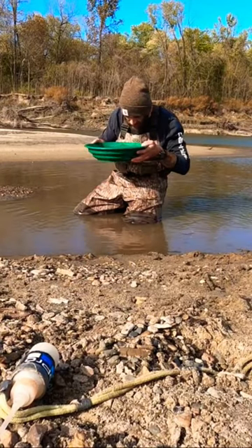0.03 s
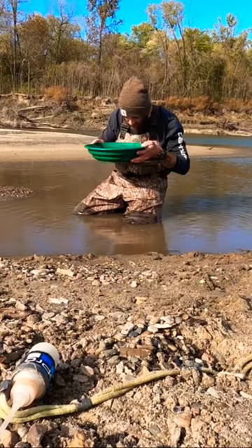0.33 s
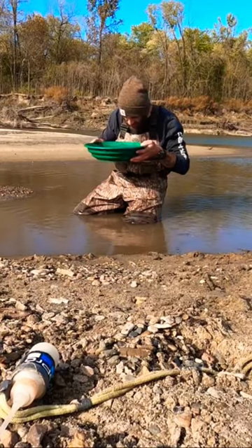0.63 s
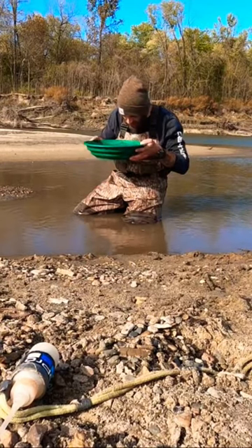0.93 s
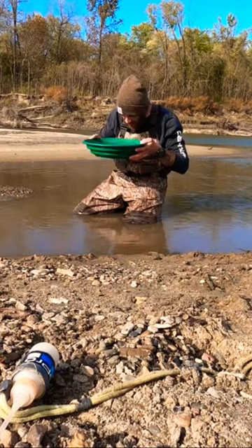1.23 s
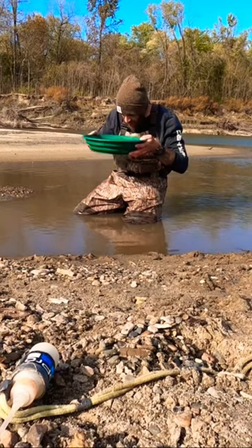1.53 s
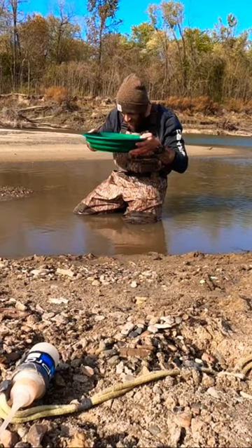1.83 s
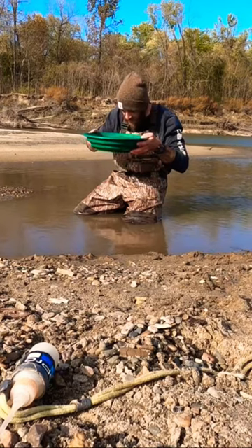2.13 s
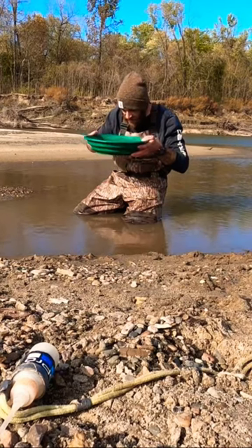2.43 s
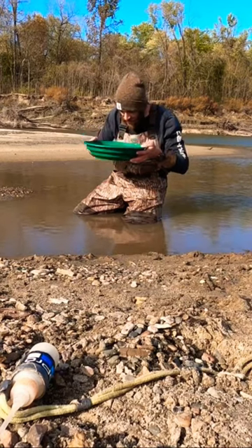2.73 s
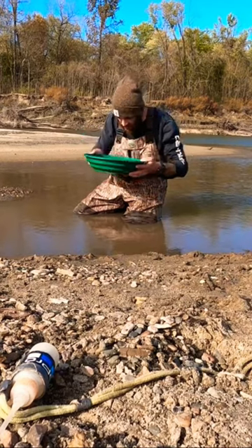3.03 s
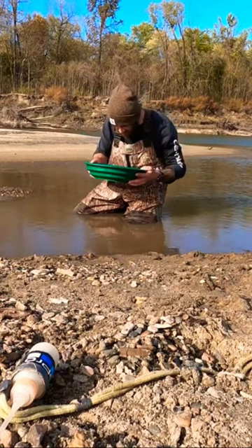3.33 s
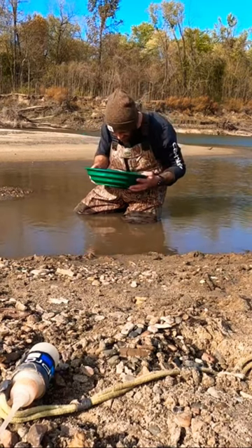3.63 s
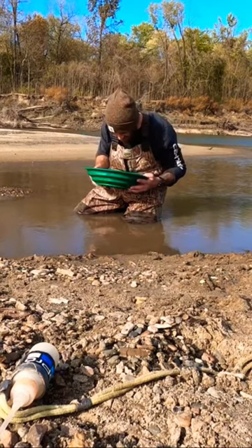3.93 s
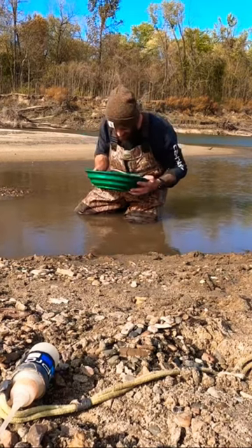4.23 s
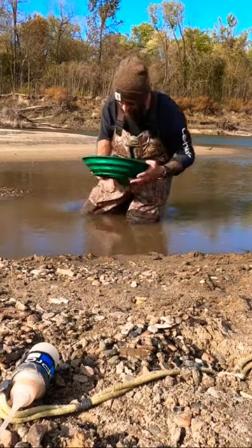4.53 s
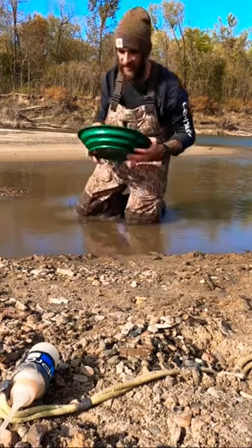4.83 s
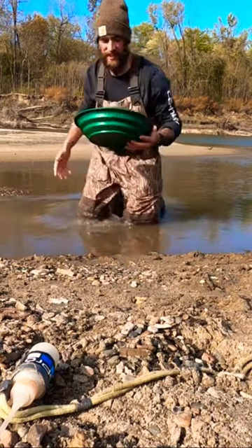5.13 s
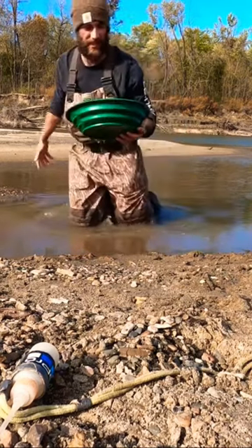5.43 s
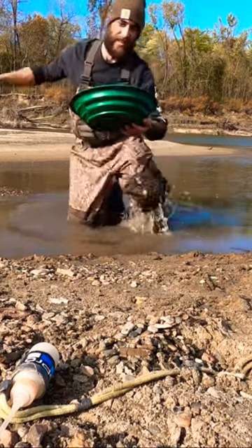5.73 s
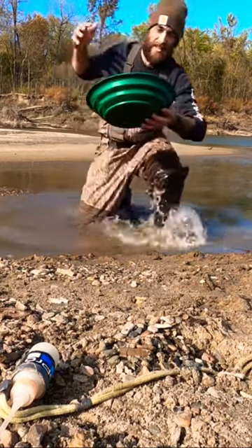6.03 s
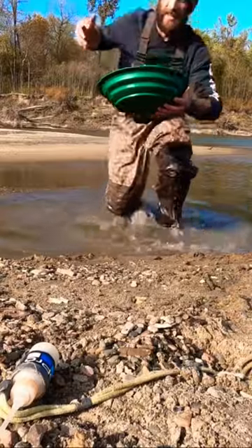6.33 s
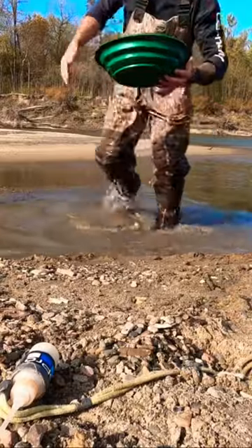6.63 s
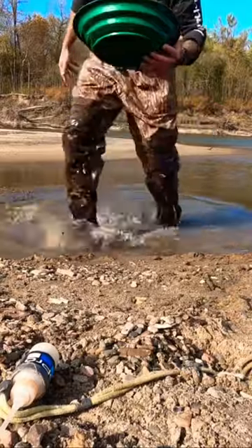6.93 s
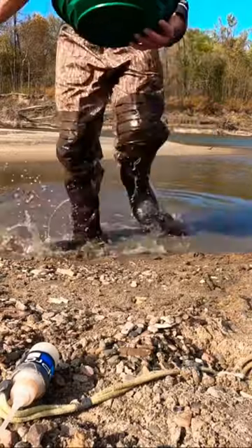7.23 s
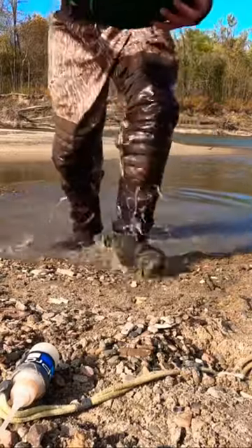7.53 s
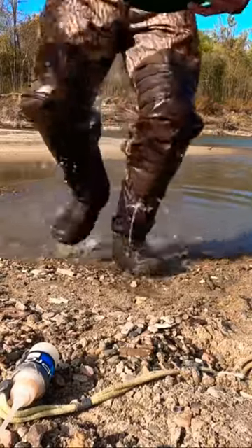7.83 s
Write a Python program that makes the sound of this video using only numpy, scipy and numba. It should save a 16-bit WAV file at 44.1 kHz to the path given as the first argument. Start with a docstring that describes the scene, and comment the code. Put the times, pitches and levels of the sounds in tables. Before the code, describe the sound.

Low wind rumbles and gusts on the microphone throughout, over a soft outdoor hiss and the drone and whine of a distant engine that fades in and out. For the first five seconds little else is heard, apart from four light, hollow knocks on a plastic pan at about 2.6, 3.2, 4.1 and 4.8 seconds. Around 5 seconds water begins to drip and plop as a man stands up in the shallow river. At about 5.8 seconds a boot pulls free with a sharp slap and a gulp. From 6 seconds he wades towards the microphone, his legs churning up bubbling, gurgling water while spray and drops patter back. Stronger splashes land near 6.5, 7.3 and 7.6 seconds. The wading is the loudest sound and continues, with stronger wind gusts, until the end at about 8 seconds.

```python
"""Wind rumbles on a microphone set low on a gravel bank, over open-air hiss and a far engine's drone.
Out in the shallow river a kneeling man swirls water in a plastic pan, knocking it lightly now and then.
He stands, water running off his waders, and wades towards the microphone: his legs churn up clouds of
ringing bubbles, air pockets plop and gurgle, his boots slap and gulp, and thrown water patters back."""
import sys
import numpy as np
from scipy import signal
from scipy.fft import rfft, irfft, next_fast_len
from scipy.io import wavfile
from numba import njit

SR = 44100
rng = np.random.default_rng(int(sys.argv[2]) if len(sys.argv) > 2 else 0)


def log_audio(samples):
    """Write samples as a 16-bit WAV file to the path given in sys.argv[1]."""
    # one column per channel
    frames = np.atleast_2d(samples).T
    # limit to full scale, then quantise
    limited = np.clip(frames, -1, 1)
    pcm = np.round(limited * 32767).astype(np.int16)
    wavfile.write(sys.argv[1], SR, pcm)


N = 351918
TIME = np.arange(N) / SR
IMPACT_SWELL, BUBBLE_SWELL, POCKET_SWELL = .6, .9, 1.47  # cycles taken to sound fully


def undb(db):
    """Decibels to gain."""
    return 10 ** (np.asarray(db) / 20)


def unit(x):
    """Scale to rms 1."""
    return x / np.sqrt(np.mean(x ** 2) + 1e-18)


def colour(x, points):
    """Causal filter through (Hz, dB) points, built from the cepstrum of the log gain."""
    hz, db = np.transpose(points)
    size = next_fast_len(2 * N, real=True)
    bins_hz = np.maximum(np.fft.rfftfreq(size, 1 / SR), 1)
    gain = undb(np.interp(np.log(bins_hz), np.log(hz), db))
    cepstrum = irfft(np.log(gain), size)
    cepstrum[1:size // 2] *= 2
    cepstrum[size // 2 + 1:] = 0
    return irfft(rfft(x, size) * np.exp(rfft(cepstrum)), size)[:N]


def wander(per_s):
    """Random drift with a spread near 1."""
    knots = rng.standard_normal(4096)
    return 1.2 * np.interp(TIME * per_s, np.arange(len(knots)), knots)


def envelope(s, hold, attack, release):
    """Gain that rises to 1 at s, holds and falls, by 20 dB in each attack or release time."""
    before, after = np.maximum(s - TIME, 0), np.maximum(TIME - s - hold, 0)
    return undb(-20 * (before / attack + after / release)) + 1e-9


@njit
def ring(start, size, hz, t60, rise, swell):
    """Bubbles or modes: sines that swell, then die away while their pitch climbs by the share `rise`."""
    out = np.zeros(N)
    for k in range(len(start)):
        first, count = int(start[k] * SR), max(int(t60[k] * SR), 2)
        fade = np.exp(-np.log(1000) / count)
        gain, phase = size[k], 0.
        for i in range(min(count, N - first)):
            phase += 2 * np.pi * min(hz[k] * (1 + rise[k] * i / count) / SR, .45)
            gain *= fade
            onset = min(phase / (2 * np.pi * swell), 1.)
            out[max(first + i, 0)] += gain * onset * onset * (3 - 2 * onset) * np.sin(phase)
    return out


# Wind right on the microphone: (frequency [Hz], gain [dB])
WIND_COLOUR = [(10, -17), (22, 2), (55, 1.5), (110, -2.5), (200, -8.5), (300, -18), (500, -26), (800, -34),
               (1500, -101), (6000, -100)]
# Gusts at the microphone: (peak time [s], level [dB], length [s])
GUSTS = [(0.402, -26.5, 0.083), (0.57, -23.5, 0.085), (1.105, -25.5, 0.058), (1.256, -31.5, 0.36),
         (1.565, -26, 0.067), (1.78, -26.5, 0.2), (1.975, -23.5, 0.083), (3.348, -28, 0.12),
         (3.683, -28, 0.096), (4.19, -34.5, 0.57), (5.758, -18, 0.052), (6.107, -25, 0.57),
         (6.485, -28, 0.24), (6.84, -19, 0.2), (7.06, -28.5, 0.29), (7.542, -22, 0.1), (7.784, -18, 0.087),
         (7.9, -20, 0.092)]

def wind(breeze_db=-33, buffet_db=1.13):
    """Eddies buffet the microphone: a steady breeze, and bell-shaped gusts that are a little brighter."""
    gust_power = sum(undb(db) ** 2 * np.exp(-(2 * (TIME - s) / length) ** 2) for s, db, length in GUSTS)
    breeze, eddies = (colour(rng.standard_normal(N), WIND_COLOUR) for _ in range(2))
    eddies = colour(eddies, [(50, 0.0019), (150, 2.2)])
    rumble = undb(breeze_db) * unit(breeze) + np.sqrt(gust_power) * unit(eddies)
    return rumble * undb(buffet_db * wander(25))


# Open air all round the river: (frequency [Hz], gain [dB])
AIR_COLOUR = [(30, 6), (150, 5.5), (320, 4), (500, 0.5), (700, -7), (1000, -16.5), (2200, -21.5),
              (4200, -30.5), (6000, -38.5), (8000, -49.5), (9500, -63.5), (15000, -80)]

def open_air(level_db=-40.5):
    """A soft, nearly steady outdoor hiss."""
    hiss = unit(colour(rng.standard_normal(N), AIR_COLOUR))
    return hiss * undb(level_db + 0.27 * wander(1.1))


# An engine far off, as heard at the bank: (time [s], drone [dB], its octave [dB], whine [dB])
ENGINE_LEVELS = [(0, -38.5, -48.5, -67.5), (.8, -36.5, -42.5, -66.5), (1.8, -42, -45, -45),
                 (2.8, -40.5, -41.5, -46.5), (4.1, -43, -56.5, -46), (4.6, -47, -57, -62),
                 (5.05, -43.5, -43, -57.5), (5.8, -56.5, -47, -44), (6.7, -27, -45.5, -46.5),
                 (7.3, -42.5, -59, -63), (7.98, -26.5, -45, -59)]

def far_engine(drone_hz=118.8, whine_hz=323, third_harmonic_db=-55, waver=0.00598, fading_db=2.0):
    """The drone and whine of distant machinery fade in and out on the breeze."""
    times, *columns = np.transpose(ENGINE_LEVELS)
    drone_db, octave_db, whine_db = (np.interp(TIME, times, column) for column in columns)
    phase_per_hz = 2 * np.pi * np.cumsum(1 + waver * wander(9)) / SR
    drone = sum(undb(db + fading_db * wander(7)) * np.sin(k * drone_hz * phase_per_hz)
                for k, db in enumerate([drone_db, octave_db, third_harmonic_db], start=1))
    whine = undb(whine_db) * np.sin(whine_hz * phase_per_hz)
    return np.sqrt(2) * (drone + whine)


# Thin running water, out in the river: (frequency [Hz], gain [dB])
TRICKLE_COLOUR = [(500, -12), (1200, -0.5), (3300, -1.5), (5000, -9), (7000, -12.5), (8500, -20.5),
                  (10000, -24.5), (11500, -29.5), (14000, -65.5)]

def water_film(swirl_db=-72, drain_db=-64, stands_s=4.53, ramp_s=0.65, patter_db=2.5):
    """A film of water hisses unevenly: dull as it circles the pan, brighter as it runs off the waders."""
    trickle = colour(rng.standard_normal(N) * undb(patter_db * wander(150)), TRICKLE_COLOUR)
    swirl = colour(trickle, [(5000, -6), (7500, -4.5), (9500, -24.5)])
    swirling = undb(swirl_db) * np.clip((stands_s - TIME) / ramp_s, 0, 1)
    draining = undb(drain_db) * envelope(stands_s, hold=1.7, attack=ramp_s, release=ramp_s)
    return unit(swirl) * swirling + unit(trickle) * draining


# Light knocks on the pan, out where he kneels: (time [s], level [dB])
PAN_KNOCKS = [(2.582, -39), (3.219, -43), (4.130, -37), (4.831, -33.5)]
# The pan's resonances: (frequency [Hz], gain [dB], time to fall 60 dB [s])
PAN_MODES = [(450, -1, .025), (560, 0, .022), (710, 0, .02), (960, -4, .017), (1200, -5, .02),
             (1580, -17, .014)]

def pan_knocks():
    """The wet plastic pan answers each knock with a few short, hollow modes."""
    hz, mode_db, t60 = np.transpose(PAN_MODES).copy()
    return sum(ring(np.full(len(hz), s), undb(db + mode_db), hz, t60, np.zeros(len(hz)), IMPACT_SWELL)
               for s, db in PAN_KNOCKS)


def cloud(level_db, spectrum, low_hz, high_hz, per_s, cycles, spread_db, rise, from_s=5.0):
    """Random bubbles and drops that follow a level; gentler water makes fewer of them."""
    when, pitch, strength, damping, glide, luck, sign = rng.random((70000, 7)).T
    start = from_s + when * (TIME[-1] - from_s)
    level = undb(np.interp(start, TIME, level_db))
    activity = (level / level.max()) ** .4
    sounds = luck < activity * per_s * np.ptp(start) / len(start)
    hz = low_hz * (high_hz / low_hz) ** pitch
    scatter_db = spread_db * np.minimum(-np.log(1 - strength), 4.5)
    size = np.sign(sign - .5) * undb(scatter_db) * level / np.sqrt(activity)
    t60 = cycles * 2 ** (2 * damping - 1) / hz
    bubbles = ring(start[sounds], size[sounds], hz[sounds], t60[sounds],
                   2 * rise * glide[sounds], BUBBLE_SWELL)
    return unit(colour(bubbles, spectrum)) * np.sqrt(np.mean(undb(level_db) ** 2))


# Four textures of the water round his legs, each (frequency [Hz], gain [dB])
CHURN_COLOUR = [(150, 5), (350, -12.5), (600, -4), (1000, 2.5), (1600, 2.5), (2100, 0), (3000, -3),
                (6000, -52)]
SPRAY_COLOUR = [(700, -19), (1600, -6.5), (2300, 1), (3200, 4.5), (4300, 2.5), (5500, -45), (9000, -19)]
FIZZ_COLOUR = [(2500, -36), (4300, -3), (5300, -3.5), (7200, -8), (8400, -14.5), (9500, -12), (11200, -28),
               (12200, -34), (15000, -35)]
SPATTER_COLOUR = [(2000, -4), (6000, -2.5), (10000, -5.5), (11300, -9), (12200, -15), (15000, -13)]
# Leg strokes nearing the microphone, levels ahead of the mix:
# (time at full force [s], hold [s], churn [dB], spray [dB], fizz [dB], attack [s], release [s])
LEG_STROKES = [(5.178, 0.065, -55, -58, -66, 0.059, 0.081), (5.58, 0.25, -44, -49, -60, 0.23, 0.82),
               (6.111, 0.089, -35, -41, -52.5, 0.14, 0.61), (6.281, 0.3, -33, -30.5, -41.5, 0.16, 0.23),
               (6.79, 0.072, -42, -45.5, -57, 0.18, 0.076), (6.888, 0.47, -40.5, -42.5, -58, 0.35, 0.28),
               (7.262, 0.037, -42, -30.5, -39, 0.017, 0.23), (7.363, 0.066, -34.5, -32, -43, 0.022, 0.12),
               (7.584, 0.031, -31.5, -34, -41.5, 0.3, 0.066), (7.69, 0.16, -37.5, -36.5, -46, 0.18, 0.21),
               (7.934, 0.035, -33.5, -24.5, -33.5, 0.09, 0.14)]

def wading(wake_db=-12.5, wake_s=1.4, slosh_db=1.07):
    """Each leg stroke folds air into the water; falling spray makes smaller bubbles, fizz and ticks."""
    power = 0
    for s, hold, *levels_db, attack, release in LEG_STROKES:
        wake = undb(wake_db) * envelope(s, hold, attack, wake_s)  # stirred water laps on
        push = np.maximum(envelope(s, hold, attack, release), wake)
        power = power + np.outer(undb(levels_db), push) ** 2
    churn_db, spray_db, fizz_db = 10 * np.log10(power) + slosh_db * wander(36)  # the flow surges
    spatter_db = 0.61 * spray_db - 34.5  # tiny drops keep falling in gentle water
    churn = cloud(churn_db, CHURN_COLOUR, 273.5, 2075, per_s=3700, cycles=20.5, spread_db=-1.5, rise=.3)
    glugs = cloud(churn_db, CHURN_COLOUR, 818, 2010, per_s=190, cycles=44, spread_db=0, rise=.19)
    spray = cloud(spray_db, SPRAY_COLOUR, 1548, 5400, per_s=5500, cycles=50, spread_db=2.2, rise=.17)
    fizz = cloud(fizz_db, FIZZ_COLOUR, 4340, 14980, per_s=15000, cycles=99, spread_db=2.2, rise=.03)
    spatter = cloud(spatter_db, SPATTER_COLOUR, 2980, 11700,
                    per_s=3200, cycles=10, spread_db=1.5, rise=.05)
    return undb(-2) * churn + undb(-6) * glugs + undb(-1.5) * spray + undb(0.34) * fizz + spatter


# Water landing in the shallows: (time [s], level before filtering [dB], length [s], centre pitch [Hz])
SLAPS = [(5.15, -47.5, 0.009, 2000), (5.175, -49, 0.014, 2100), (5.216, -54, 0.035, 3770),
         (5.272, -46, 0.0073, 2760), (5.458, -40.5, 0.0073, 2800), (5.499, -38, 0.0061, 2510),
         (5.627, -39.5, 0.013, 3920), (5.771, -20.5, 0.0076, 1090), (5.774, -43, .016, 3300),
         (5.838, -44, 0.0032, 5000), (6.492, -23, .015, 2730), (6.582, -28.5, 0.025, 2370),
         (6.671, -32, 0.014, 2580), (6.837, -34, 0.028, 2300), (7.012, -36, 0.024, 2560),
         (7.115, -29.5, 0.017, 2070), (7.133, -34, 0.0072, 3400), (7.192, -43.5, 0.0048, 7060),
         (7.267, -24, 0.018, 2620), (7.305, -20.5, 0.027, 2500), (7.426, -28, 0.0088, 4400),
         (7.449, -23, 0.00087, 6460), (7.563, -22, 0.008, 2580)]

def slaps(cycles=17, spread_octaves=0.467, straggler_db=-22, count=200):
    """Water hits the surface: a tight cluster of short drop impacts, then weaker stragglers."""
    out = np.zeros(N)
    for s, db, length, centre_hz in SLAPS:
        when = 3 * rng.random(count)  # in slap lengths
        pitch, size = rng.standard_normal((2, count))
        hz = np.minimum(centre_hz * 2 ** (spread_octaves * pitch), SR / 4)
        size = size * undb(straggler_db * np.sqrt(np.maximum(when - 1, 0)))
        burst = ring(s + length * when, size, hz, cycles / hz, np.zeros(count), IMPACT_SWELL)
        out += burst * undb(db) * np.sqrt(length * SR / np.sum(burst ** 2))
    return colour(out, [(300, -19), (1000, -5.5), (7000, -1), (10500, -0.5), (12500, -14)])


# Single air pockets along his way to the bank: (time [s], level before the boost [dB], pitch [Hz])
PLOPS = [(5.152, -40, 2070), (5.192, -38, 3490), (5.2124, -32.5, 4320), (5.224, -44, 7640),
         (5.238, -36, 2960), (5.531, -34, 1690), (5.545, -31.5, 1014), (5.776, -25.5, 5900),
         (5.7817, -19, 1950), (5.782, -34, 6350), (5.784, -25, 940), (5.84, -31, 1850),
         (5.886, -28.5, 1380), (5.892, -31.5, 2680), (5.935, -27.5, 1430), (5.941, -32, 2000),
         (5.959, -31, 2480), (6.009, -32, 1820), (6.022, -32, 4440), (6.06, -32, 2000),
         (6.111, -20.5, 1000), (6.137, -25, 1200), (6.199, -21, 1040), (6.21, -20, 950),
         (6.238, -20.5, 2250), (6.368, -19.5, 412), (6.391, -19, 1540), (6.444, -20.5, 1025),
         (6.49, -21.5, 706), (6.51, -14.5, 1550), (6.593, -19.5, 1390), (6.667, -22, 1550),
         (6.676, -23, 2430), (6.705, -27.5, 1040), (6.841, -28, 1200), (6.903, -21, 1530),
         (7.031, -29.5, 690), (7.268, -22, 942), (7.279, -14, 2210), (7.325, -18, 1560),
         (7.4805, -19.5, 713), (7.508, -20.5, 985), (7.604, -18.5, 1110), (7.6272, -22.5, 810),
         (7.655, -23.5, 1004), (7.694, -24, 1310), (7.737, -23.5, 1670), (7.8084, -16, 968),
         (7.812, -19, 1340)]

def plops(cycles=35, rise=0.077, boost_db=1.0):
    """Air pockets pinch off at the boots and under drips; the larger, the lower and longer they ring."""
    start, db, hz = np.transpose(PLOPS).copy()
    return ring(start, undb(db + boost_db), hz, cycles / hz, np.full(len(hz), rise), POCKET_SWELL)


def drips(from_s=5.45, level_db=-29, growth_db=11, growth_s=.75,
          count=90, low_hz=2300, high_hz=7500, cycles=62, rise=.1):
    """Drops fall from the waders and ping on the surface, louder as he stands and comes nearer."""
    when, pitch, strength = rng.random((count, 3)).T
    start = from_s + (np.arange(count) + when) / count * (TIME[-1] - from_s)
    hz = low_hz * (high_hz / low_hz) ** pitch
    distance_loss_db = growth_db * np.clip(1 - (start - from_s) / growth_s, 0, 1)
    scatter_db = -2 * np.minimum(-np.log(1 - strength), 3)
    size = undb(level_db - distance_loss_db + scatter_db) * np.sqrt(low_hz / hz)
    return ring(start, size, hz, cycles / hz, np.full(count, rise), POCKET_SWELL)


# Gurgles beside his legs: (time [s], length [s], typical pocket level [dB], pitch [Hz])
GURGLES = [(5.52, 0.24, -44, 1700), (5.56, .36, -44, 1054), (5.739, .18, -34.5, 600),
           (6.119, 0.43, -26, 997), (6.131, .36, -33.5, 684), (6.191, .42, -27.5, 1197),
           (6.78, 0.13, -28, 1600), (7.7, 0.12, -29, 704)]

def gurgles(per_s=36, scatter_octaves=0.092, cycles=50, rise=0.073):
    """A hollow in the water sheds pockets of nearly one pitch in quick, uneven succession."""
    out = np.zeros(N)
    for s, length, db, pitch_hz in GURGLES:
        count = int(length * per_s)
        when, pitch, strength = rng.random((32, 3))[:count].T
        hz = pitch_hz * 2 ** (scatter_octaves * (2 * pitch - 1))
        start = s + length * (np.arange(count) + when) / count
        size = undb(db) * (.5 + strength)
        out += ring(start, size, hz, cycles / hz, np.full(count, rise), POCKET_SWELL)
    return out


# Boots pulling free in the shallows: (time [s], level [dB], starting pitch [Hz], time to fall 60 dB [s])
BOOT_GULPS = [(5.7716, -19, 930, 0.043), (6.795, -27.5, 524, 0.076)]

def gulps(rise=3.8):
    """The hollow behind a lifted boot shrinks quickly, so its note sweeps steeply upwards."""
    start, db, hz, t60 = np.transpose(BOOT_GULPS).copy()
    return ring(start, undb(db), hz, t60, np.full(len(hz), rise), BUBBLE_SWELL)


def banks(sound, level_db=-17, t60=.25):
    """The river banks scatter a faint, short echo back to the microphone."""
    t = TIME[:SR // 2]
    response = rng.standard_normal(len(t)) * undb(-60 * t / t60)
    return undb(level_db) * signal.fftconvolve(sound, response / np.linalg.norm(response))[:N]


def scene():
    """One microphone on the gravel: water and pan nearby, wind on top, air and engine behind."""
    near = wading() + water_film() + plops() + gulps() + gurgles() + slaps() + drips() + pan_knocks()
    return (near + banks(near) + wind() + open_air() + far_engine())[None]


def record(dry):
    """The camera on the bank cuts the treble above 15.1 kHz."""
    return signal.sosfilt(signal.ellip(8, .2, 70, 15100, fs=SR, output="sos"), dry)


dry = scene()
out = record(dry)
log_audio(out)
```